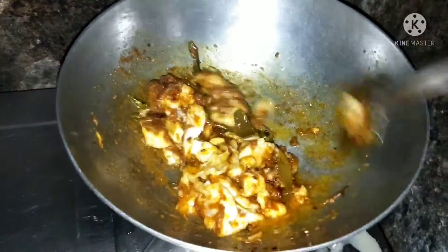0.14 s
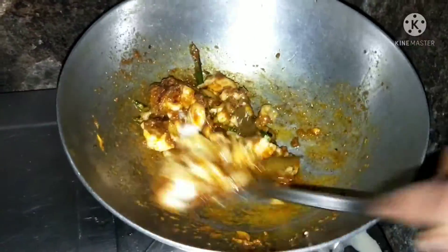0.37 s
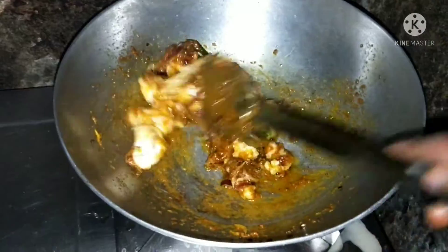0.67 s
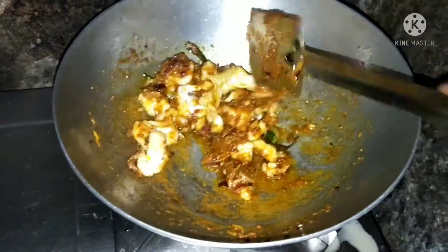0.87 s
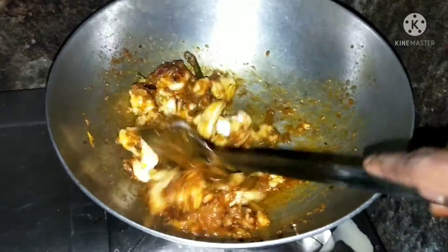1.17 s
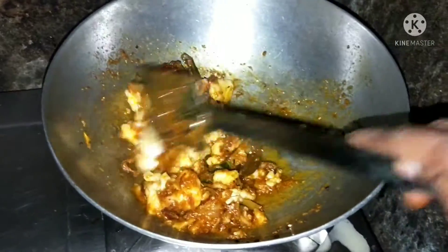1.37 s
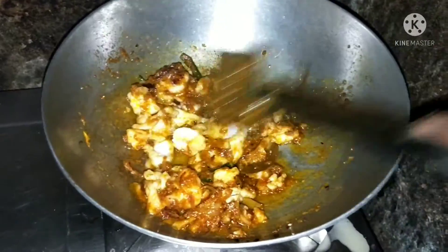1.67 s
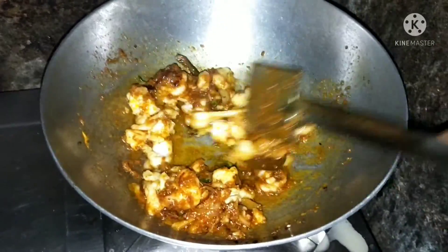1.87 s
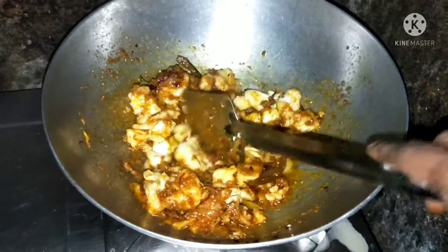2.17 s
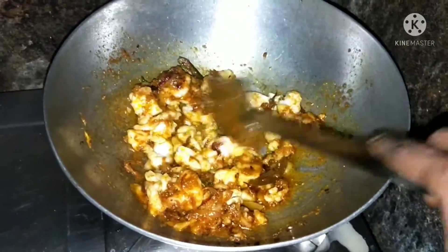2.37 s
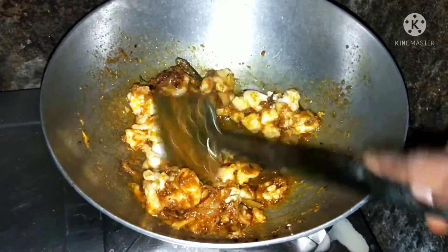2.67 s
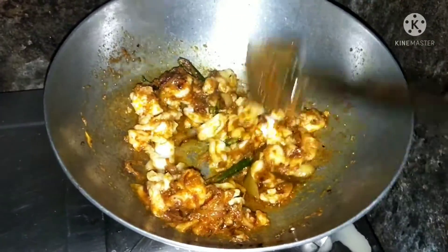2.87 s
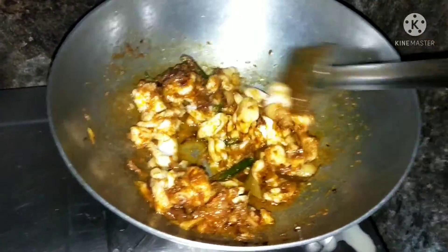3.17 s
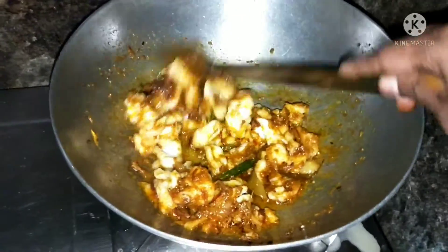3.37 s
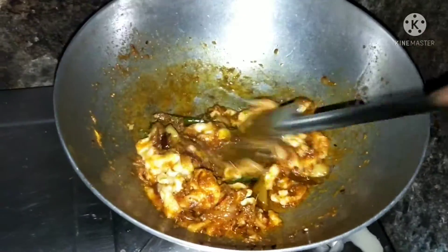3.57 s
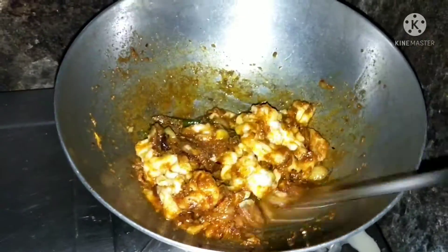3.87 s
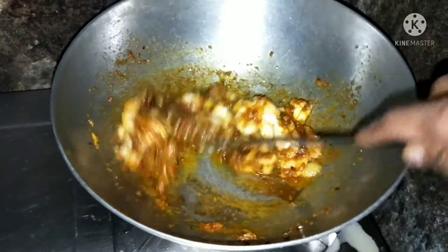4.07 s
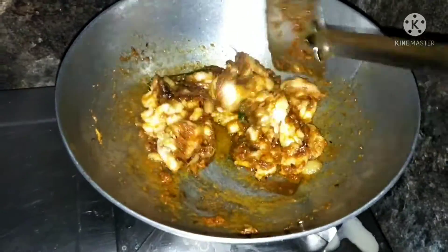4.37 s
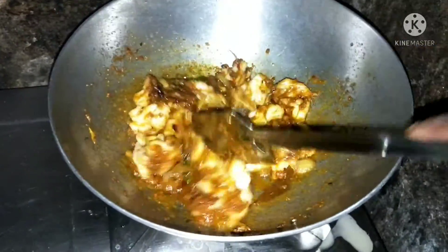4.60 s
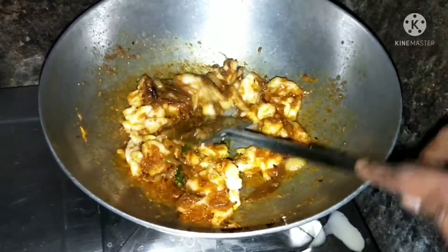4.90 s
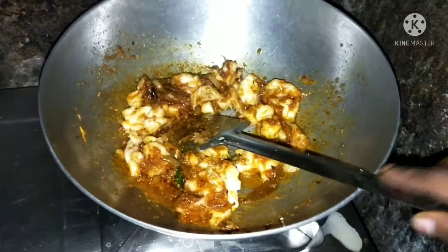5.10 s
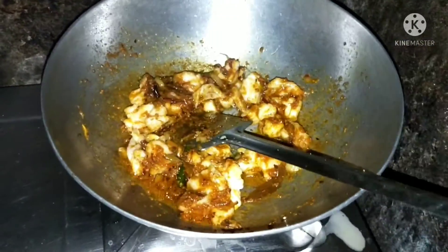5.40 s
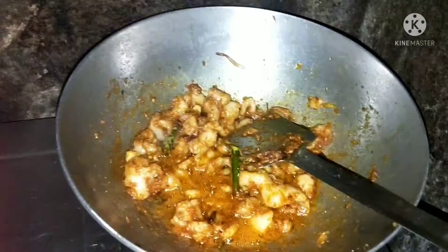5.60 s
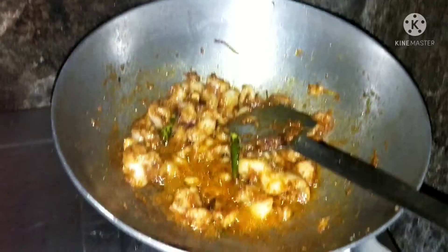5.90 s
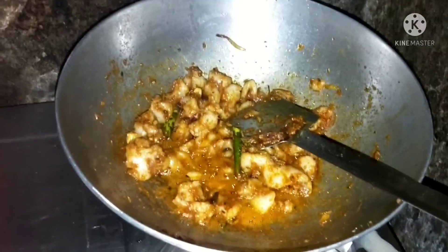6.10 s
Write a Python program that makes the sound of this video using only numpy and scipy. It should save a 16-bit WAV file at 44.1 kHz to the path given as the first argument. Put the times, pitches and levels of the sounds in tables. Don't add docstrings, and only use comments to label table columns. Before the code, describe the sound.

Fat pieces sizzle loudly in a thin metal wok while a steel spatula scrapes, knocks and clacks, then a brief gap and quiet simmering.

```python
import sys
import numpy as np
from scipy import signal
from scipy.fft import rfft, irfft
from scipy.io import wavfile
from scipy.ndimage import uniform_filter1d

SR = 44100
rng = np.random.default_rng(int(sys.argv[2]) if len(sys.argv) > 2 else 0)


def unload_audio(sound):
    columns = np.transpose(np.atleast_2d(sound))
    steps = np.round(np.clip(columns, -1, 1) * 32767)
    wavfile.write(sys.argv[1], SR, steps.astype(np.int16))


def gain_from_db(level_db):
    decades = np.asarray(level_db, float) / 20
    return 10 ** decades


N = 275625
T = np.arange(N) / SR
HZ = np.fft.rfftfreq(N, 1 / SR)
CUT_S = 5.667

# (frequency [Hz], level [dB], t60 [s])
WOK_MODES = [(247.7, 1, 0.23), (302.8, -3, 0.26), (337.7, -8.5, 0.44), (366.4, 2, 0.21), (432, 4, 0.065),
             (465, -2, 0.15), (558.4, -2.5, 0.097), (629, -0.5, 0.12), (702, -4, 0.12), (779, -3, 0.16),
             (857, -7, 0.22), (933, -2.5, 0.11), (1058, -4, 0.076), (1100, -17.5, 0.24), (1171, -6.5, 0.14),
             (1225, -11, 0.14), (1310, -9.5, 0.12), (1433, -18, 0.18), (1534, -14.5, 0.076),
             (1717, -4, 0.062), (1987, -22, 0.26)]
# (start [s], hold [s], shove [dB], grit [dB])
STROKES = [(0.09, 0.13, -31.5, -36.5), (0.258, 0.034, -31.5, -38), (0.357, 0.22, -49.5, -42),
           (0.678, 0.046, -49.5, -44), (0.846, 0.037, -50, -46.5), (1.465, 0.059, -57, -47.5),
           (1.819, .02, -55, -49), (2.08, 0.045, -49, -54), (2.216, 0.06, -38, -51),
           (2.46, 0.14, -47.5, -53.5), (2.833, 0.018, -49, -49.5), (2.987, .01, -53.5, -47.5),
           (3.187, .08, -53, -58), (3.282, 0.019, -43.5, -40), (3.335, 0.086, -41, -41.5),
           (3.708, 0.011, -44.5, -55), (3.91, 0.17, -58.5, -40.5), (4.143, 0.095, -49, -43.5),
           (4.346, 0.0081, -42, -43.5), (4.571, 0.014, -50, -42), (4.867, .01, -54, -46.5),
           (5.122, 0.0064, -37, -40.5), (5.217, 0.052, -64, -44.5), (5.422, 0.069, -50.5, -48)]


def colour(points, hz):
    p = np.array(points, float)
    return gain_from_db(np.interp(np.log(np.maximum(hz, 1)), np.log(p[:, 0]), p[:, 1]))


def unit(x, lo_hz, hi_hz):
    power = np.abs(rfft(np.mean(x, axis=0))[(HZ > lo_hz) & (HZ < hi_hz)]) ** 2
    return x / (np.sqrt(2 * power.sum()) / N)


def band(x, lo_hz, hi_hz):
    return signal.sosfilt(signal.butter(2, [lo_hz, hi_hz], "bandpass", fs=SR, output="sos"), x)


def walk(rate_hz):
    hold = int(SR / rate_hz)
    steps = rng.standard_normal(2000)[np.arange(N) // hold]
    return 1.3 * uniform_filter1d(uniform_filter1d(steps, hold), hold)


def clicks(rate_hz, spread_db):
    size = rng.choice([-1., 1.], N) * gain_from_db(spread_db * np.minimum(rng.exponential(size=N), 5))
    x = size * (rng.random(N) < rate_hz / SR)
    return x / x.std()


def decaying_sines(modes, t):
    return sum(gain_from_db(db - 60 * t / t60_s) * np.sin(2 * np.pi * hz * t) for hz, db, t60_s in modes)


def sides(pan_db):
    return gain_from_db(np.array([pan_db, -pan_db]) / 2)


def shots(first, later):
    return np.where(T < CUT_S + .05, first, later)


def strokes(peak_db, rise_db_s, fall_db_s, rest_db):
    level_db = np.full(N, float(rest_db))
    for (start_s, hold_s, *_), db in zip(STROKES, peak_db):
        rise_db = rise_db_s * np.maximum(start_s - T, 0)
        fall_db = fall_db_s * np.maximum(T - start_s - hold_s, 0)
        level_db = np.maximum(level_db, db - rise_db - fall_db)
    return level_db


def response(points):
    cepstrum = irfft(np.log(colour(points, np.fft.rfftfreq(2048, 1 / SR))))
    cepstrum[1:1024] *= 2
    cepstrum[1025:] = 0
    return irfft(np.exp(rfft(cepstrum)))[:768]


def ports(x):
    # (frequency [Hz], level [dB per Hz])
    left_port = [(150, -44.5), (500, -25.5), (1000, -43.5), (2000, -12), (2900, -8), (3900, -13),
                 (4600, -8.5), (5300, -5), (6200, -12), (7500, -20.5), (10000, -25), (12500, -25.5),
                 (14600, -17.5), (16500, -30)]
    right_port = [(150, -28), (500, -31.5), (1000, -28), (1600, 0.5), (2300, 3.5), (2900, 6.5), (3400, 2.5),
                  (4100, -8), (5500, -9.5), (7000, -16.5), (9000, -26), (12500, -23), (14500, -30),
                  (16500, -16.5)]
    return np.array([signal.oaconvolve(c, response(p))[:N] for c, p in zip(x, (left_port, right_port))])


def fry():
    # (time [s], sizzle [dB], left minus right [dB])
    fry_levels = [(0.0, -27.5, 5), (0.1, -34.5, 5), (0.59, -32, 8), (0.7, -36, 8), (0.91, -35.5, 6.5),
                  (1.05, -35.5, 6.5), (1.35, -34, 6), (2.1, -34.5, 5), (2.47, -37, 6.5), (2.55, -43, 9),
                  (2.72, -45, 11.5), (2.84, -38, 9), (3.16, -41, 9.5), (3.29, -34.5, 6.5), (3.81, -36.5, 6),
                  (4.06, -32.5, 7.5), (4.37, -36.5, 4.5), (5.05, -36, 7.5)]
    s, db, pan_db = np.transpose(fry_levels)
    return shots(np.interp(T, s, db), -51.5), shots(np.interp(T, s, pan_db), 6.5)


def sizzle():
    edges_hz = [0, 700, 1400, 2100, 3000, 4200, 5600, 7000, 9000, 12000, SR]
    pops = rfft(clicks(rate_hz=330, spread_db=4.5))
    swell = walk(1.485)
    spray_db = shots(2.5, -10) - 0.5 * walk(7.7)
    out = np.zeros((2, N))
    for lo, hi in zip(edges_hz, edges_hz[1:]):
        shared = rng.standard_normal(N) * np.clip(1.3 - hi / 1500, .25, .95)
        fizz = np.array([shared + 1.2 * rng.standard_normal(N) + 0.6 * clicks(rate_hz=640, spread_db=1.0)
                         for _ in "LR"])
        layer = irfft((rfft(fizz) + 0.31 * pops) * ((HZ >= lo) & (HZ < hi)), N)
        flicker_db = 0.33 * swell + 1.6 * walk(14.) + spray_db * (lo > 6500)
        out += layer / layer.std() * np.sqrt(min(hi, SR / 2) - lo) * gain_from_db(flicker_db)
    level_db, pan_db = fry()
    return unit(ports(out), 2200, 9100) * gain_from_db(level_db) * sides(pan_db)


def ring(force, spot_db, damp):
    out = np.zeros((2, N))
    for k, (hz, db, t60_s) in enumerate(WOK_MODES):
        pole = np.exp(2j * np.pi * hz / SR - np.log(1000) / (damp * t60_s * SR))
        part = np.searchsorted([260, 800], hz)
        z = signal.lfilter([(-1) ** k * gain_from_db(db)], [1, -pole], force[part] * gain_from_db(spot_db * walk(8.3)))
        lag = rng.standard_normal() * min((hz / 560) ** 2, 1.7)
        out[0] += z.imag
        out[1] += (z * np.exp(1j * lag)).imag * min(0.4 + hz / 1100, 1.5)
    return band(out, 180.5, 3400)


def drag():
    _, _, shove, scrape = np.transpose(STROKES)
    shove_db = shots(strokes(shove, rise_db_s=611, fall_db_s=210.5, rest_db=-70), -72)
    grit_db = shots(strokes(scrape, rise_db_s=155.5, fall_db_s=44.5, rest_db=-56), -62)
    rasp_gain = np.hypot(gain_from_db(grit_db - 5), gain_from_db(fry()[0] - 13.5 + 1.8 * walk(7.4)))
    slip = clicks(rate_hz=900, spread_db=1.5) * gain_from_db(3.04 * walk(30.))
    grit = gain_from_db(grit_db - 28.0) * slip
    swing_db = np.minimum(np.roll(shove_db, int(.012 * SR)), -30)
    phase = 2 * np.pi * np.cumsum(WOK_MODES[0][0] * (1 + 0.012 * walk(35.))) / SR
    bowl = np.sqrt(2) * gain_from_db(swing_db + 3. * walk(40.)) * np.sin(phase) * sides(2.3)[:, None]
    rasp = band(np.array([clicks(rate_hz=2900, spread_db=2.5) for _ in "LR"]), 950, 1600)
    body = ring([grit, grit, gain_from_db(-2.5) * grit], spot_db=3, damp=.5)
    return bowl + body + rasp_gain * rasp / rasp.std() * sides(-2.5)[:, None]


def blows():
    # (time [s], flank [dB], bowl [dB], rim [dB], left minus right [dB])
    hard_blows = [(0.065, -20, -11, -23, -4), (0.097, -12, -34, -19, 0.5), (0.152, -24, -25.5, -27, 2.5),
                  (0.242, -15, -29.5, -30.5, 5.5), (0.396, -25, -27, -39, 3), (0.542, -21.5, -29, -31.5, 0),
                  (2.221, -10.5, -31, -17, -1.5), (2.248, -29.5, -32.5, -15.5, 8.5),
                  (2.271, -22.5, -45, -24.5, 0), (2.469, -15, -18, -18, 7), (2.835, -26.5, -30.5, -27.5, 4),
                  (3.172, -30, -33, -36, 1.5), (3.383, -21.5, -40, -30.5, 2.5),
                  (3.894, -30, -40.5, -31, 3.5), (4.15, -23.5, -25.5, -30.5, 0),
                  (4.353, -31.5, -41, -42, 0), (5.079, -33.5, -46, -35.5, -2), (5.124, -26, -39, -29.5, 1)]
    # (time [s], flank [dB], left minus right [dB])
    soft_bumps = [(0.68, -33, 6), (0.724, -39, 7), (1.448, -33, -1), (1.847, -34, -2), (2.075, -29, 0.5),
                  (3.002, -44, 7), (3.267, -32.5, 0), (3.3, -42.5, 19), (3.444, -23.5, 1), (3.679, -27, 0),
                  (3.724, -38.5, 8), (3.836, -32.5, 2), (3.941, -29, 1), (3.984, -38, 1), (5.423, -28, -1)]
    chatter_s, clank_db, clank_t60_s = 0.033, -19.5, 0.21
    force, pan_db = np.zeros((3, N)), np.zeros(N)
    t = T[:int(.2 * SR)]
    bumps = [(s, db, db - 3, db - 12, pan) for s, db, pan in soft_bumps]
    for s, flank_db, bowl_db, rim_db, pan in sorted(hard_blows + bumps):
        rattle = rng.standard_normal(len(t))
        push = .024 * rattle * np.abs(rattle) * np.exp(-t / chatter_s)
        push[0] += 1
        k = int((s + .0015) * SR)
        part_db = np.array([bowl_db - 7.0, flank_db - 11.0, rim_db - 2.0])
        force[:, k:k + len(t)] += gain_from_db(part_db)[:, None] * push[:N - k]
        pan_db[k:] = pan
    dense = rng.standard_normal(len(t)) + .5 * rng.standard_normal((2, len(t)))
    dense = dense * gain_from_db(clank_db - 60 * t / clank_t60_s)
    clank = signal.oaconvolve(force[1:].sum(axis=0)[None], dense, axes=1)[:, :N]
    body = ring(force, spot_db=1.5, damp=.6) + band(clank, 380, 1200)
    return body * sides(uniform_filter1d(pan_db, 200) + 1.0)


def clacks():
    # (time [s], peak [dB], top share [dB], left minus right [dB], crack [0-1])
    clack_events = [(0.0667, -8, -27.5, 2.5, 0.28), (0.0988, -11, -24.5, 8.5, 1),
                    (0.1996, -29, -28.5, -2, 0.5), (0.2455, -15.5, -23.5, 4, 0),
                    (0.395, -40.5, -13, 0, 0.8), (0.549, -32, -19, -7, 0.6), (1.5554, -20, -30, 0.5, 0.79),
                    (2.2242, -9.5, -31, 1, 0.45), (2.2445, -17, -21, -9.5, 0.06),
                    (2.4722, -10, -20, 5, 0.88), (2.8379, -25, -18.5, 5, 0.47),
                    (3.1752, -27.5, -6, 5.5, 0.7), (3.337, -24.5, -17.5, 3, 0.3),
                    (3.3819, -25.5, -21, 2, 0.26), (3.89, -18.5, -4, -5, 0.06),
                    (3.8973, -19, -12.5, 8, 0.55), (3.905, -25, -33, 4, 0.2), (3.979, -31, -6.5, -8, 0),
                    (4.568, -25.5, -23.5, -3, 0.3), (5.0726, -19.5, -13.5, -2, 0.37),
                    (5.1296, -23, -22, -1.5, 0.36), (5.514, -36.5, -29, -15, 0.72),
                    (6.126, -46, -30, 16, 0.5), (6.1535, -37, -38, 6, 0.7)]
    # (frequency [Hz], level [dB], t60 [s])
    edge_modes = [(4600, -39.5, .05), (5376, -40, .05), (5360, -47.5, .06), (5595, -28, 0.038),
                  (7270, -34.5, 0.15)]
    # (frequency [Hz], level [dB], t60 [s])
    tine_modes = [(2745, -46, .15), (2914, -46, .18)]
    blade_hz, blade_width_hz, blade_db = 2850, 700, 3
    low, top = np.zeros((2, 2, N))
    t = T[:int(.1 * SR)]
    for s, db, top_db, pan_db, crack in clack_events:
        grit = rng.standard_normal((2, len(t)))
        grit = 0.6 * grit + 0.47 * grit[0]
        contact_s = 0.014 * (1 - 0.74 * crack)
        crack = min(crack, .98)
        skid = np.exp(-(t / contact_s) ** 2) * (1 - np.exp(-t / (contact_s * 0.35 * (1 - crack))))
        burst = grit * np.abs(grit) ** .5 * skid
        burst[:, 0] += 24 * crack
        burst = gain_from_db(db) * burst * sides(pan_db + 0.74)[:, None]
        k = int(s * SR)
        low[:, k:k + len(t)] += burst[:, :N - k]
        top[:, k:k + len(t)] += gain_from_db(top_db + 24.0) * burst[:, :N - k]
    top = top + signal.oaconvolve(top, decaying_sines(edge_modes, t)[None], axes=1)[:, :N]
    split = np.clip((HZ - 3500) / 3500, 0, 1)
    blade = 1 + gain_from_db(blade_db) / (1 + (2 * (HZ - blade_hz) / blade_width_hz) ** 2)
    high_pass = HZ ** 2 / (HZ ** 2 + 1300 ** 2)
    x = irfft((rfft(low) * blade * (1 - split) + rfft(top) * split) * high_pass, N)
    t = T[:int(.3 * SR)]
    tail = gain_from_db(-21.5) * rng.standard_normal((2, len(t))) * gain_from_db(-60 * t / 0.12)
    tail += decaying_sines(tine_modes, t)
    tail[:, 0] = 1
    return gain_from_db(-1.87) * ports(signal.oaconvolve(x, tail, axes=1)[:, :N])


def rings():
    # (start [s], frequency [Hz], level [dB], t60 [s])
    lone_modes = [
        (0.11, 635, -24, .3),
        (0.72, 456, -40, 0.62),
        (0.98, 457, -49.5, .9),
        (1.7, 367, -50, .8),
        (2.27, 870, -32.5, 0.46),
        (2.5, 1100, -35, .3),
        (3.919, 3070, -41, .9),
        (4.15, 596, -30.5, 0.16),
        (4.45, 629, -51.5, 1.9),
        (4.72, 629, -54.5, 2.5),
    ]
    out = np.zeros(N)
    for s, hz, db, t60_s in lone_modes:
        t = np.maximum(T - s, 0)
        swell = 1 - np.exp(-t / 0.0073)
        out += gain_from_db(db - 60 * t / t60_s + 2.6 * walk(25.)) * swell * np.sin(2 * np.pi * hz * t)
    return shots(out, 0) * sides(1.5)[:, None]


def stand():
    # (frequency [Hz], level [dB per Hz])
    boom_colour = [(20, -39.5), (40, -5), (65, -11), (80, 5), (95, -12.5), (130, -4.5), (190, -10.5),
                   (300, -10), (600, -95.5)]
    hum_hz, hum_db, hum_starts_s, hum_rise_s = 98.5, -57, 5.83, 0.069
    mid, side = irfft(rfft(rng.standard_normal((2, N))) * colour(boom_colour, HZ), N)
    hum = np.sqrt(2) * gain_from_db(hum_db + 1.5 * walk(30.)) * np.sin(2 * np.pi * hum_hz * T)
    rock_db = -46.5 + 0.62 * (np.minimum(np.transpose(STROKES)[2], -34) + 34)
    boom_db = shots(strokes(rock_db, rise_db_s=305.5, fall_db_s=78, rest_db=-65.5), -66.5)
    boom = unit(mid * sides(1.5)[:, None] + .14 * side * np.array([[1], [-1]]), 55, 120) * gain_from_db(boom_db)
    late = np.clip((T - hum_starts_s) / hum_rise_s, 0, 1)
    return late * hum + shots(1, late) * boom


def scene():
    return sizzle() + drag() + blows() + clacks() + rings() + stand()


def starve(x, depth_db):
    # (frequency [Hz], share [0-1])
    starved_share = [(3750, 0), (4000, .34), (4250, .25), (4500, 0), (6500, .03), (8200, .3), (10000, .26),
                     (12500, .3), (14000, .08), (15400, .25)]
    top_hz = 15700
    hz, _, z = signal.stft(x, SR, nperseg=1024)
    luck = uniform_filter1d(rng.standard_normal((1, 129, z.shape[2])), size=5, axis=2)
    luck = np.repeat(luck / luck.std(), 4, axis=1)[:, :len(hz)]
    share = np.clip(np.interp(hz, *np.transpose(starved_share), left=0), 0, 1)[:, None]
    rank = 1 / (1 + np.exp(-1.7 * luck))
    gain = gain_from_db(depth_db * np.clip((share - rank) / .03, 0, 1))
    gain = gain * np.where(hz > top_hz, gain_from_db(-60), 1)[:, None]
    return signal.istft(z * gain, SR, nperseg=1024)[1][:, :N]


def band_limit(x):
    return signal.sosfilt(signal.butter(12, 16650, fs=SR, output="sos"), x)


def record(dry):
    fade_out_ends_s, fade_out_s = 5.738, 0.19
    back_s, fade_in_s, fade_in_bend = 5.795, .15, 1.6
    fade_out = np.clip((fade_out_ends_s - T) / fade_out_s, 0, 1) * np.clip((CUT_S - T) / .002, 0, 1)
    fade_in = np.clip((T - back_s) / fade_in_s, 0, 1) ** fade_in_bend
    limited = np.tanh(.9 * dry) / .9
    return band_limit(starve(limited, depth_db=-28) * (fade_out + fade_in))


dry = scene()
out = record(dry)
unload_audio(out)
```